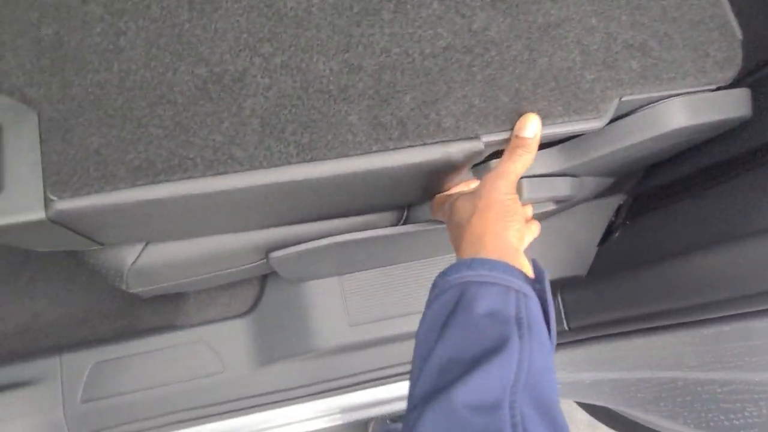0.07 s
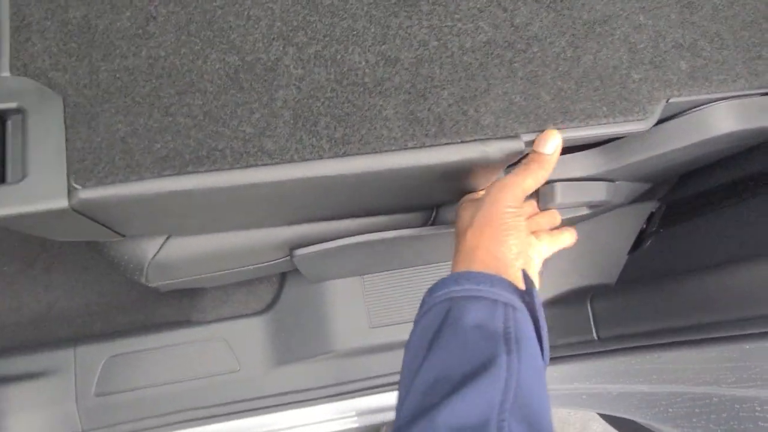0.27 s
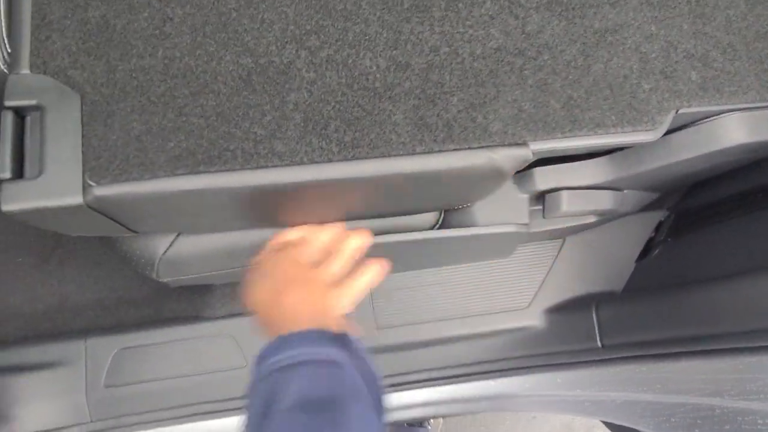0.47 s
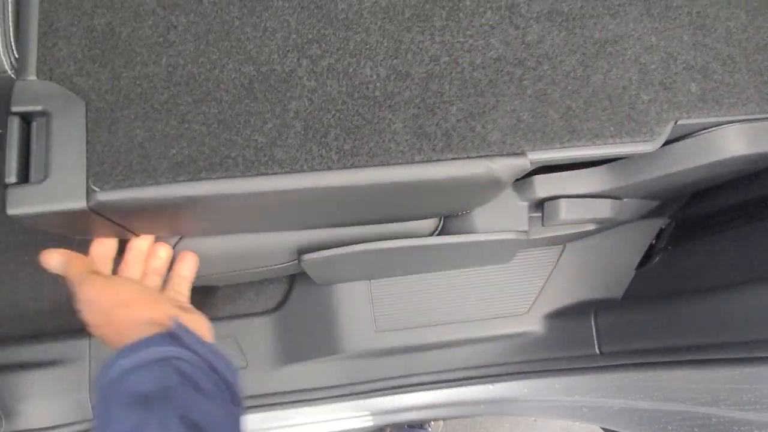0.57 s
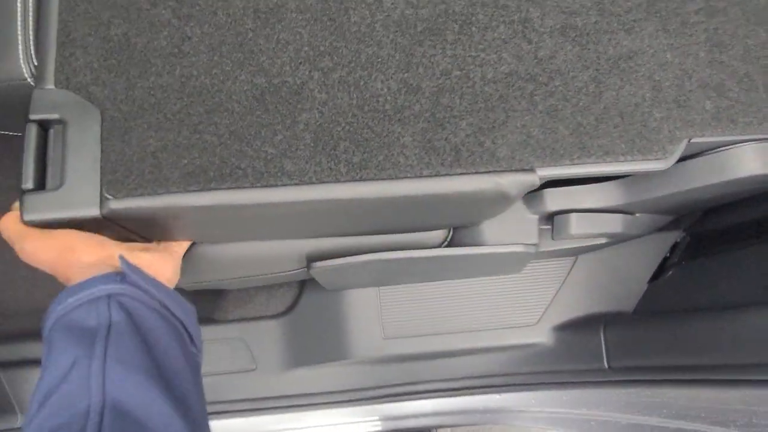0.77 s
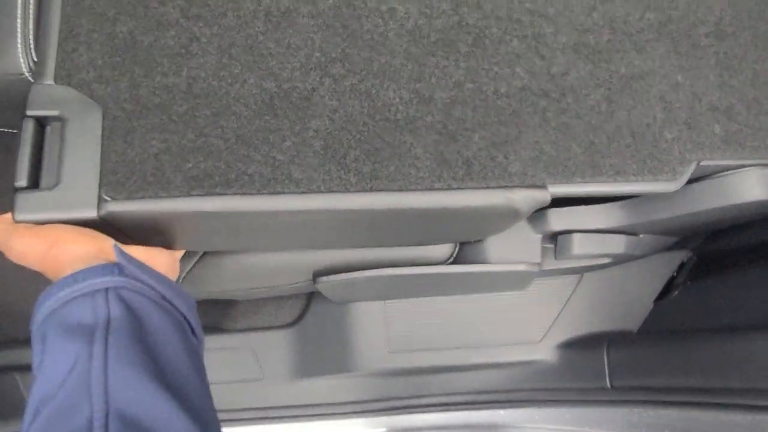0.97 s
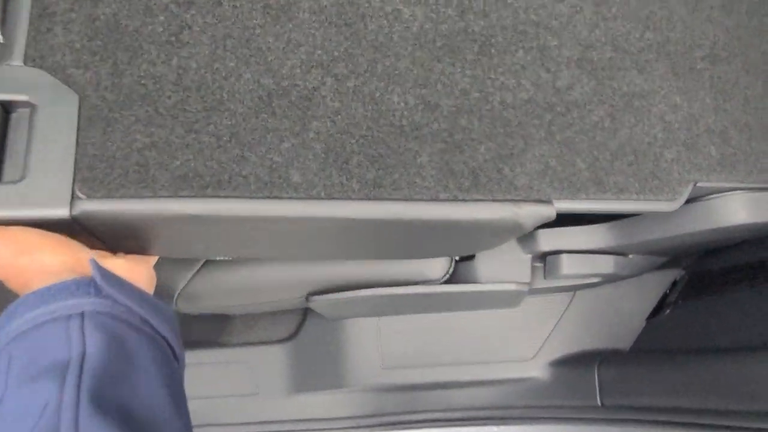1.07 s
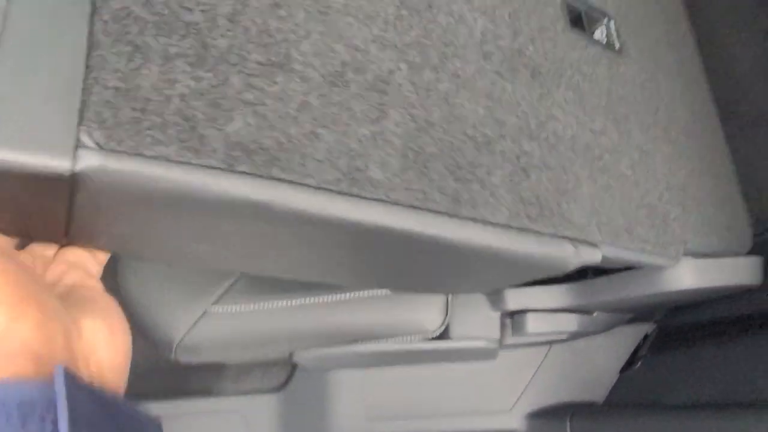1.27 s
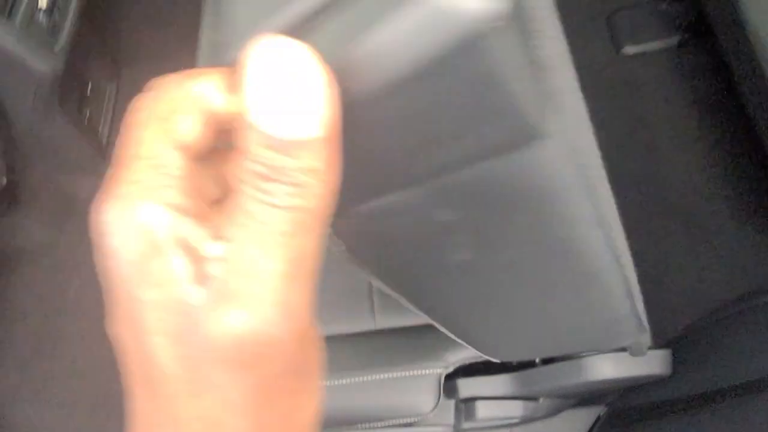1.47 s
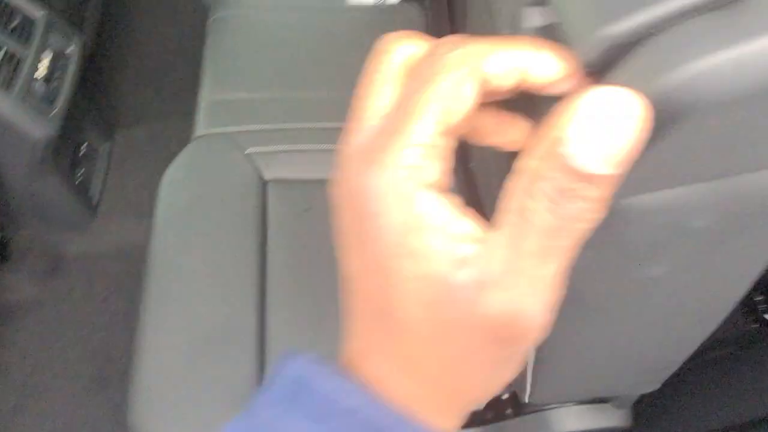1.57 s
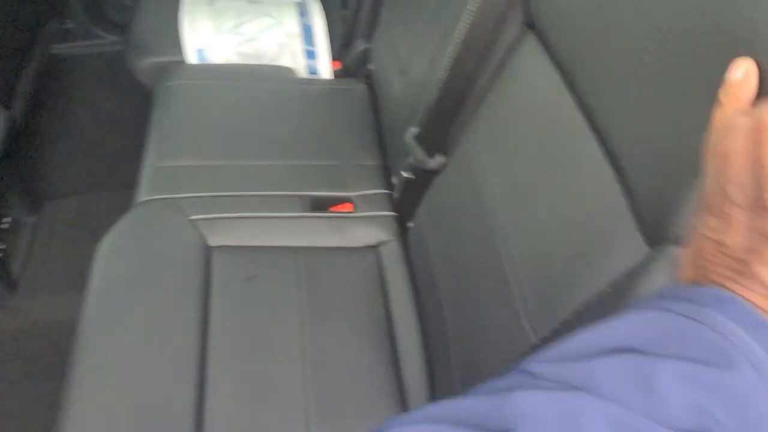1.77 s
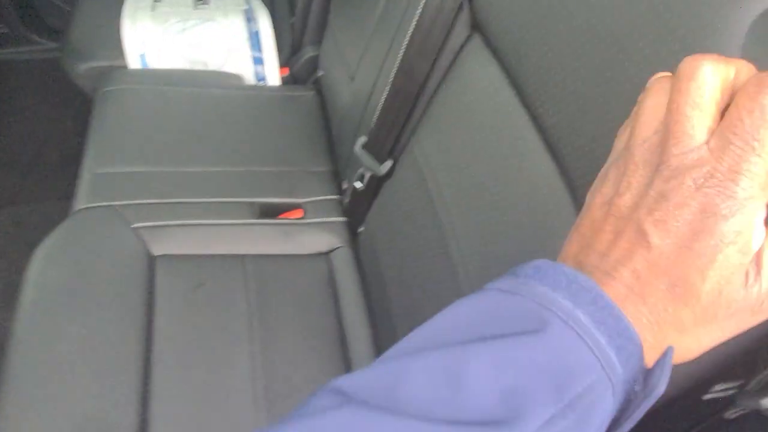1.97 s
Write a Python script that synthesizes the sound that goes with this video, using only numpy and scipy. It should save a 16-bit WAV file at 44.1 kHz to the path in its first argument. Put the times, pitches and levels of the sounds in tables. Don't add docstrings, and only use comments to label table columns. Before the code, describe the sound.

A car seat back slams into its latch with a heavy, boomy clunk and metallic rattle, after quiet cloth rubbing, small trim creaks and hinge ticks over a low steady drone, heard close inside a parked vehicle.

```python
import sys
import numpy as np
from scipy import signal
from scipy.io import wavfile
from scipy.ndimage import uniform_filter1d

SR = 44100
rng = np.random.default_rng(int(sys.argv[2]) if len(sys.argv) > 2 else 0)


def transcribe(u):
    v = np.clip(np.atleast_2d(u).T, -1, 1)
    q = np.round(v * 32767).astype(np.int16)
    wavfile.write(sys.argv[1], SR, q)


def how_loud(loudness_db):
    steps = np.asarray(loudness_db, float) / 20
    return 10 ** steps


N = 89170


def rms_one(x):
    return x / np.sqrt(np.mean(x ** 2) + 1e-20)


def at_hz(points, hz):
    table_hz, values = np.transpose(points)
    return np.interp(np.log(hz), np.log(table_hz), values)


def in_time(rows):
    return np.interp(np.arange(N) / SR, *np.transpose(rows))


def tilt(db_per_octave, hz):
    return how_loud(db_per_octave * np.log2(hz / 4000))


def drift(rate):
    pole = np.exp(-80 * np.pi * rate / SR)
    chance = rng.standard_normal(N // 40 + 2002)
    slow = signal.lfilter([1], [1, -2 * pole, pole * pole], chance)[2000:]
    return np.interp(np.arange(N) / 40, np.arange(len(slow)), rms_one(slow - slow.mean()))


def dying(s, db, t60, rise=0.0012):
    t = np.maximum(np.arange(N) / SR - s, 0)
    return how_loud(db - 60 * t / t60) * (1 - np.exp(-t / rise))


def grainy():
    grains_per_s, grain_spread_db, share = 1800, 1.5, 0.35
    heights = how_loud(grain_spread_db * np.minimum(rng.exponential(1, N), 4))
    clicks = heights * (rng.random(N) < grains_per_s / SR)
    gate = rms_one(uniform_filter1d(clicks, size=12))
    return rng.standard_normal((2, 2, N)) * np.sqrt(1 - share + share * gate ** 2)


# (frequency [Hz], likeness [-1 to 1])
LEFT_RIGHT_LIKENESS = [(60, 0.86), (130, 0.91), (290, 0.37), (640, -0.61), (1410, -0.39), (3100, 0.045),
                       (6820, -0.11), (15000, 0.049)]


def spread(mid, side, hz):
    alike = np.clip(at_hz(LEFT_RIGHT_LIKENESS, hz), -1, 1)
    shared = np.sqrt((1 + alike) / 2) * mid
    return shared + np.sqrt((1 - alike) / 2) * side * np.array([[1], [-1]])


BAND_EDGES_HZ = 70 * 2 ** np.arange(0, 8.1, .4)


def bank(spectrum, white, envelope):
    out, power = 0, 0
    for k, (low, high) in enumerate(zip(BAND_EDGES_HZ, BAND_EDGES_HZ[1:])):
        hz = np.sqrt(low * high)
        if hz <= .8 * spectrum[0][0]:
            continue
        gain = how_loud(at_hz(spectrum, hz))
        band = signal.butter(2, [low, high], "band", fs=SR, output="sos")
        mid, side = signal.sosfilt(band, white[k % 2] * envelope(hz) + 1e-18)
        out = out + gain * spread(mid, side, hz)
        power = power + gain ** 2 * (high - low) * 2 / SR
    return out / np.sqrt(power)


def rings(rows, rise, width):
    out = np.zeros((2, N + SR))
    for (s, db, hz, t60), chance in zip(rows, rng.uniform(-1.8, 1, (len(rows), 2))):
        alike = np.clip(at_hz(LEFT_RIGHT_LIKENESS, hz), -1, 1)
        lead = width * np.arccos(alike) / 2
        t, i = np.arange(int(t60 * SR)) / SR, int(s * SR)
        tone = np.sin(2 * np.pi * hz * t + np.array([[-lead], [lead]]))
        tone = tone * (1 - np.exp(-t / rise)) ** 2
        out[:, i:i + len(t)] += how_loud(db - 60 * t / t60 + 1.1 * chance[:, None]) * tone
    return out[:, :N]


DULL_ABOVE_HZ = 1400


def octaves_above_dull(hz):
    return max(np.log2(hz / DULL_ABOVE_HZ), 0)


# (time [s], rattle level [dB], knock level [dB], knock pitch [Hz], brightness [dB per octave])
BLOWS = [(1.8089, -17.5, -44, 305, -22), (1.816, -23, -6.5, 294.5, -1), (1.829, -32.5, -16.5, 150.2, -23),
         (1.8523, -12.5, -5, 370.3, -1), (1.866, -22.5, -10.5, 201.8, 1.5), (1.876, -25, -32, 285, -1.5),
         (1.8977, -17, -10, 444, -2.2), (1.907, -21.5, -9.5, 235.8, -6), (1.919, -39.5, -14, 185, -9),
         (1.937, -35.5, -15, 170, -11), (1.979, -30.5, -15, 331.6, -2.5), (1.994, -66, -14, 186, -9)]
# (frequency [Hz], level [dB])
RATTLE_COLOUR = [(400, -4.5), (700, -2.5), (1200, -6), (1700, -10.5), (2700, -17.5), (5000, -26),
                 (6600, -22), (15500, -32.5)]
# (frequency [Hz], decay t60 [s])
RATTLE_DECAY = [(200, 0.11), (1500, 0.12), (5000, 0.13), (15000, .09)]


def rattle():
    snap_db, snap_t60_s = 6.5, 0.016
    snaps = [dying(s, db + snap_db, snap_t60_s, rise=0.0004) for s, db, *_ in BLOWS]

    def shaking(hz):
        total = 0
        for snap, (s, db, _, _, tilt_db) in zip(snaps, BLOWS):
            tail = dying(s, db, at_hz(RATTLE_DECAY, hz))
            total = total + (snap + tail) * how_loud(tilt_db * octaves_above_dull(hz))
        return total

    return bank(RATTLE_COLOUR, grainy(), shaking)


KNOCK_EAR_LAG = .55


def knocks():
    cycles = 26.2
    modes = [(1, 0), (1.333, 7)]   # (pitch ratio, loss [dB])
    rows = [(s, db - loss, hz * ratio, cycles / hz)
            for s, _, db, hz, _ in BLOWS for ratio, loss in modes]
    return rings(rows, rise=0.00098, width=KNOCK_EAR_LAG)


# (frequency [Hz], level against the rattle [dB], decay t60 [s])
FRAME_MODES = [(667, -7, 0.084), (1153, -1, 0.11), (1353, -8, 0.14), (1620, -4, 0.093), (2726, -8, 0.09)]


def frame():
    rows = []
    for s, db, _, _, tilt_db in BLOWS:
        for hz, level_db, t60 in FRAME_MODES:
            strike, detune = rng.standard_normal(2)
            struck_db = db + level_db + 3 * strike + tilt_db * 2 * octaves_above_dull(hz)
            rows.append((s, struck_db, hz * (1 + 0.0206 * detune), t60))
    return rings(rows, rise=0.00024, width=1.25)


# (time [s], level [dB], frequency [Hz], decay t60 [s])
BOOMS = [
    (1.823, -6, 78.2, 0.18),
    (1.864, -6, 77.7, 0.18),
    (1.905, -12, 105.4, .2),
    (1.94, -16.5, 66.8, 0.37),
    (1.995, -11, 72, 0.2),
]


def booms():
    return rings(BOOMS, rise=0.0021, width=KNOCK_EAR_LAG)


# (time [s], level [dB], decay t60 [s], brightness [dB per octave])
TICKS = [
    (.575, -38, 0.046, -5),
    (.599, -33.5, 0.044, -4.5),
    (.637, -40, 0.11, -4),
    (0.617, -40, 0.022, -5),
    (0.9962, -36, 0.13, -2),
    (1.0207, -27.5, 0.061, 1),
    (1.046, -30, 0.071, -2.5),
    (1.057, -33.5, 0.08, -1.5),
    (1.844, -23, 0.086, 6),
    (1.8477, -25, .05, -6.5),
]
# (frequency [Hz], level [dB])
TICK_COLOUR = [(600, -10.5), (1430, -3), (2600, -8.5), (4200, -7), (7010, -7.5), (9090, -23),
               (12700, -12.5), (15500, -24)]


def ticks():
    bursts = []
    for s, db, t60, tilt_db in TICKS:
        body = dying(s, db - 2.5, t60, rise=0.00053)
        spike = dying(s, db - 5, 0.32 * t60, rise=0.00038)
        bursts.append((body + spike, tilt_db))
    white = rng.standard_normal((2, 2, N))
    return bank(TICK_COLOUR, white, lambda hz: sum(burst * tilt(db, hz) for burst, db in bursts))


# (time [s], peak level [dB], frequency [Hz])
CREAKS = [(.542, -35, 1600), (.553, -28.5, 1680), (.560, -27, 1870), (0.569, -26, 1540),
          (.577, -35.5, 3270), (0.599, -31, 1460), (.601, -26.5, 3430), (.607, -32.5, 2100),
          (0.617, -32, 1490), (0.681, -36, 3140), (.77, -32, 808), (0.924, -37.5, 1330), (1.228, -30, 1290),
          (1.265, -32, 733), (1.688, -28, 1400), (1.712, -35, 2560), (1.78, -56, 1940)]


def creaks():
    rows = [(s, db, hz, 43 / hz) for s, db, hz in CREAKS]
    return rings(rows, rise=0.00056, width=0.85)


# (peak time [s], level [dB], swell [dB per s], fade [dB per s], brightness [dB per octave])
RUB_STROKES = [(0.099, -51, 100, 102, 0.8), (.47, -52, 63, 43, 1.3), (.578, -40, 242, 220, 0.2),
               (.655, -51, 302, 261, -2), (.685, -56, 200, 302, -4.5), (.77, -48.5, 255, 350, 1),
               (0.931, -54.5, 253, 248, -3.5), (1.079, -54.5, 298, 211, -2), (1.249, -44, 57, 73, 0.6),
               (1.45, -52, 43, 49, -0.1), (1.71, -38, 259, 61, 2.5), (1.762, -40, 114, 79, -1),
               (1.811, -39, 123, 298, -0.2), (1.99, -69, 100, 52, -13)]
# (frequency [Hz], level [dB])
CLOTH_COLOUR = [(300, -5.5), (800, -3.5), (1700, -4.5), (3300, -10), (4800, -14), (6600, -10.5),
                (9000, -19), (13500, -17)]


def cloth():
    rest_db = -69.5
    t = np.arange(N) / SR
    strokes = []
    for s, db, rise, fall, tilt_db in RUB_STROKES:
        level = db - rise * np.maximum(s - t, 0) - fall * np.maximum(t - s, 0)
        strokes.append((how_loud(level), tilt_db))
    flutter = .7 * drift(40.0)

    def rubbing(hz):
        patches = how_loud(flutter + 1.08 * drift(15.0))
        return patches * (how_loud(rest_db) + sum(stroke * tilt(db, hz) for stroke, db in strokes))

    return bank(CLOTH_COLOUR, grainy(), rubbing)


# (frequency [Hz], level [dB], pitch wander [Hz], level wander [dB], share of the swell [0 to 1])
DRONE_TONES = [(35.4, -36, 0.52, 0.9, 0.31), (61.75, -38.5, 0.51, -0.3, 0.94)]
# (time [s], level [dB])
DRONE_SWELL = [(0, 0), (.3, 2), (.45, 6.5), (.6, 0.5), (1.05, -2), (1.2, 4), (1.3, 1.5), (1.5, 5),
               (1.62, 2), (1.72, -5.5), (2.02, -4)]


def drone():
    rumble_db, rumble_top_hz, pan_db, ear_lag_rad = -41.5, 102, -1.9, -0.33
    lag = np.array([[-ear_lag_rad / 2], [ear_lag_rad / 2]])
    out = 0
    for hz, db, wander_hz, sway_db, swell_share in DRONE_TONES:
        level = how_loud(db + sway_db * drift(12.0) + swell_share * in_time(DRONE_SWELL))
        phase = 2 * np.pi * np.cumsum(hz + wander_hz * drift(0.89)) / SR
        out = out + level * np.sqrt(2) * np.sin(lag + rng.uniform(0, 5.88) + phase)
    band = signal.butter(2, [22, rumble_top_hz], "band", fs=SR, output="sos")
    noise = signal.sosfilt(band, rng.standard_normal((2, N + SR)))[:, SR:]
    rumble = how_loud(rumble_db) * rms_one(noise)
    return (out + spread(*rumble, 60)) * how_loud([[pan_db / 2], [-pan_db / 2]])


# (frequency [Hz], level [dB per Hz])
AIR_COLOUR = [(80, -13.5), (130, -11), (450, -13.5), (800, -12.5), (1030, -24.5), (1500, -14), (2600, -51),
              (15500, -71)]
# (time [s], level [dB])
AIR_OPENING = [(0, 0), (.45, 1), (.7, 3), (1.3, 3.5), (2.02, 4)]


def background():
    air = bank(AIR_COLOUR, rng.standard_normal((2, 2, N)), lambda hz: how_loud(0.4 * drift(5.1)))
    return how_loud(-46 + in_time(AIR_OPENING)) * air


def scene():
    latch = rattle() + knocks() + frame() + booms()
    hand = ticks() + creaks() + cloth()
    return latch + hand + drone() + background()


def low_pass(x):
    return signal.sosfilt(signal.butter(12, 16320, fs=SR, output="sos"), x)


def record(dry):
    rounded = 2 * np.tanh(dry / 2)
    top_cut = signal.cheby2(12, 60, 16330, fs=SR, output="sos")
    mix = np.clip(signal.sosfilt(top_cut, rounded), -1, 1)
    return low_pass(mix)


dry = scene()
out = record(dry)
transcribe(out)
```